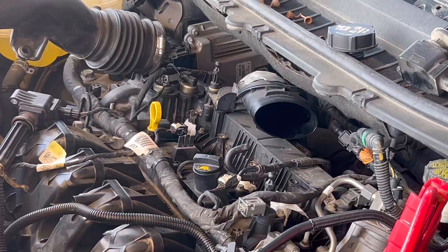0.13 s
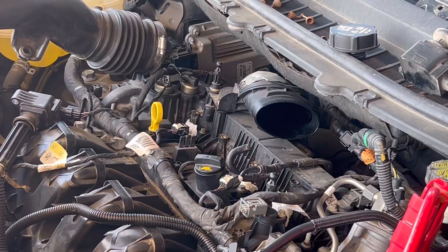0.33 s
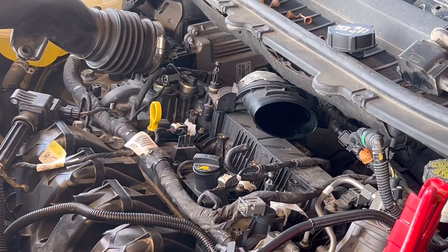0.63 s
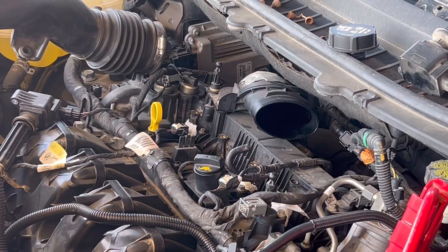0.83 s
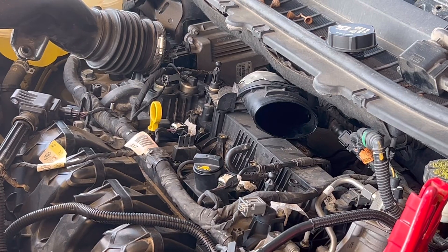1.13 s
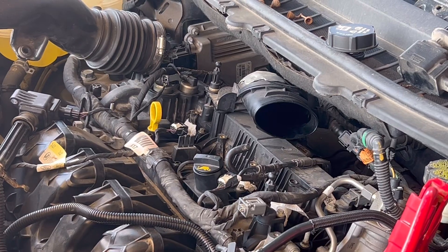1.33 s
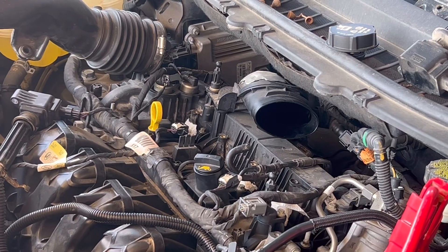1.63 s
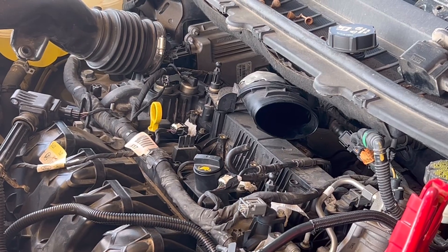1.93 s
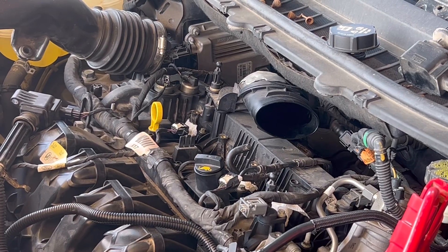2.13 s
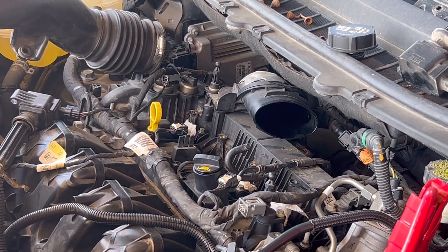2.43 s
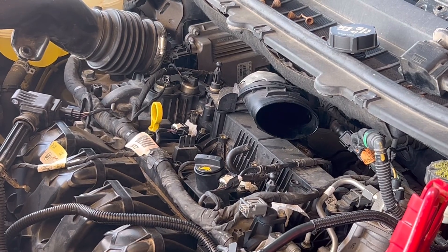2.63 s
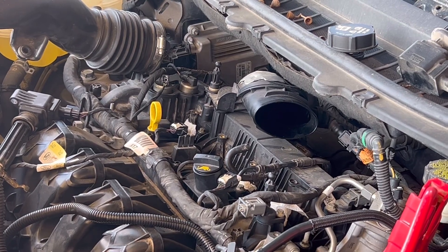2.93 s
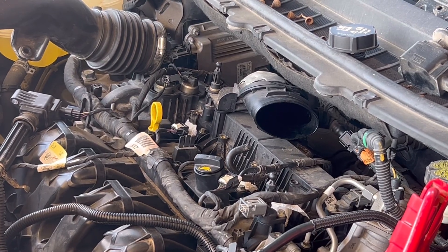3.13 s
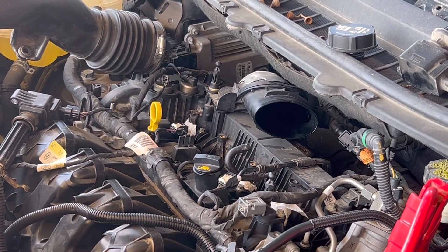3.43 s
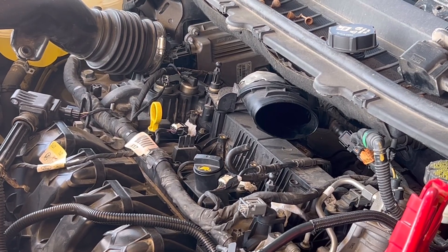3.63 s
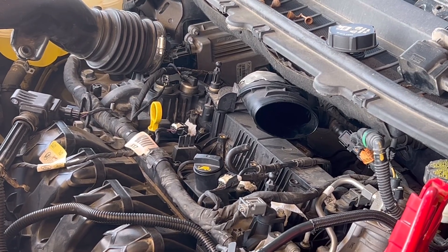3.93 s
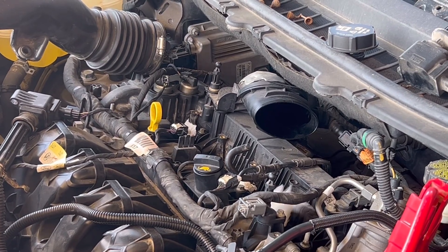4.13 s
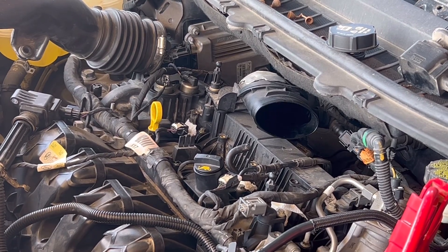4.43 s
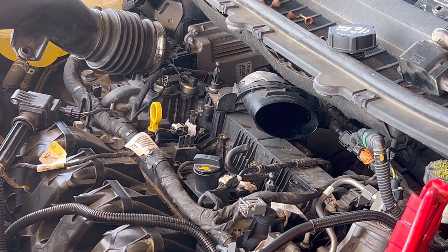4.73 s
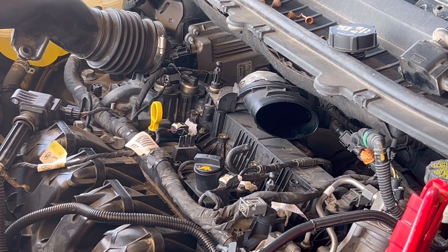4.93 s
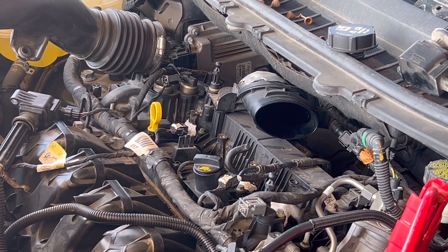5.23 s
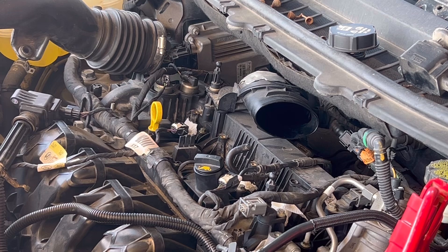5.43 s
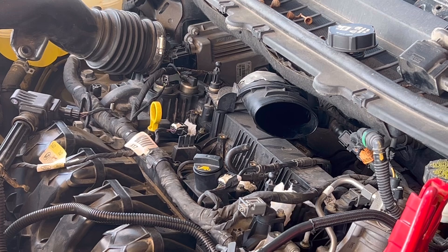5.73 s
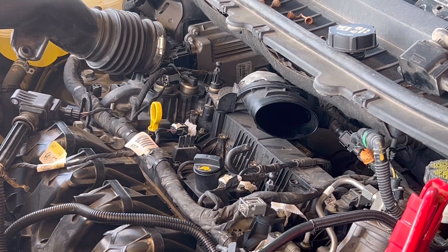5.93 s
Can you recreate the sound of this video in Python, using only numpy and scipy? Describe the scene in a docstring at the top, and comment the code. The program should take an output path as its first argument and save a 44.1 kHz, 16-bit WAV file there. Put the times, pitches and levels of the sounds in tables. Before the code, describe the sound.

After a tiny silence, a four-cylinder car engine is heard already running at a fast idle, close above its open bay. A low drone around 100 Hz, with rougher upper tones, throbs over rumble, soft mechanical rustle and faint belt hiss. It climbs in pitch until about 1.4 s, with a small spit of air near 1.0 s, then drops quickly by 1.9 s and slowly rises again, the boom growing much stronger toward 2.9 s. At 3.0 s a switch snaps: several tight bright cracks with short metallic ringing. A small electric motor immediately runs up within about half a second, through brief chirps of tone, to a high wavering whine with a strong airy rush. Engine knocks and rustle become heavier from 3.6 to 4.9 s. The motor sags slightly between 4 and 5 s, then recovers; everything continues until the abrupt end near 6.1 s.

```python
"""A car engine held at a fast idle, heard from just above the open engine bay.
From the start, its firing drone, built from unsteady tones, swells and sags over a throbbing rumble,
rustle and hiss of shaped noise, with knocks on every engine cycle. There is one brief spit of air near 1 s.
Halfway through, a switch snaps as short cracks and decaying rings. A small electric motor then runs up, with
short bursts of tone, to a wavering whine of shaft tones and a rush of air; for a while it runs a little slower."""
import sys
import numpy as np
from scipy import signal
from scipy.fft import rfft, irfft
from scipy.io import wavfile
from scipy.ndimage import uniform_filter1d

SR = 44100
rng = np.random.default_rng(int(sys.argv[2]) if len(sys.argv) > 2 else 0)


def waveform_to_disk(signal):
    """Save audio, clipped to [-1, 1], as 16-bit WAV at the path in sys.argv[1]."""
    frames = np.transpose(np.atleast_2d(signal))
    scaled = np.clip(frames, -1, 1) * 32767
    samples = np.round(scaled).astype(np.int16)
    wavfile.write(sys.argv[1], SR, samples)


N = 268657
TIME = np.arange(N) / SR  # seconds
BINS = np.fft.rfftfreq(N, 1 / SR)  # Hz

# The engine. Levels in its tables come before the gains named in its functions.
# engine speed: (time [s], firings per second [Hz])
FIRING_RATE = [(0.04, 47.0), (0.29, 48.6), (1.44, 54.3), (1.55, 53.5), (1.71, 47.2), (1.86, 45.5),
               (2.69, 48.4), (3.09, 48.2), (3.71, 51.0), (4.15, 51.0), (5.08, 52.8), (6.04, 53.6),
               (6.09, 53.2)]
# level of the boom, the 2nd multiple of the firing rate: (time [s], level [dB])
BOOM_LEVEL = [(0.04, -23.5), (0.07, -22.5), (0.21, -20.5), (0.61, -29.5), (0.8, -22.5), (0.97, -27.5),
              (1.4, -18), (1.59, -22), (1.78, -15.5), (1.88, -20.5), (2.85, -9), (3.56, -11.5),
              (3.73, -15.5), (3.9, -11.5), (4.81, -12), (6.09, -18.5)]
# level of the 3rd multiple: (time [s], level [dB])
THIRD_LEVEL = [(0.04, -24.5), (0.09, -21), (1.55, -27.5), (1.57, -24), (2.62, -24), (3.14, -38.5),
               (3.22, -31), (3.81, -22.5), (3.88, -26), (4.49, -22), (5.04, -34.5), (5.31, -26.5),
               (6.09, -22.5)]
# level of the 4th multiple: (time [s], level [dB])
FOURTH_LEVEL = [(0.04, -38), (0.21, -30), (0.87, -18.5), (1.27, -36), (1.74, -22.5), (1.83, -33.5),
                (1.98, -24), (2.31, -23), (3.02, -33), (3.54, -22), (5.58, -34), (6.09, -28.5)]
# weaker engine tones, three firings to a cycle: (multiple of firing rate, level against the rumble [dB])
WEAK_LINES = [(0.97, -12), (4 / 3, -11), (7 / 3, -8.5), (10 / 3, -10), (11 / 3, -4.5), (13 / 3, -5.5),
              (5, -5), (16 / 3, -10), (7, -11.5), (22 / 3, -15.5), (8, -17), (10, -18.5), (11, -24.5),
              (12, -23.5)]
# the bay hums along for a while: (start [s], length [s], level [dB], multiple of firing rate)
BAY_HUMS = [(0.0, .29, -34, 6), (1.56, .1, -20, 3), (1.75, .9, -43.5, 9), (1.85, 2.1, -37.5, 6),
            (3.88, .7, -31, 6), (4.03, .67, -32.5, 9), (4.87, 1.3, -38.5, 9)]
HUM_RAMP_S = 0.063
# the engine tones lean slowly from left to right: (time [s], left minus right [dB])
DRONE_SIDE = [(0.04, 1.0), (1.3, 1.6), (3.0, .6), (4.3, .5), (6.09, -1.2)]
# knocks given off by the block on every cycle: (frequency [Hz], level of a line against the rustle [dB])
CLATTER_COLOUR = [(120, -0.5), (300, -11), (450, -12.5), (600, -10.5), (850, -14), (1100, -24.5),
                  (1400, -21)]
# how hard the engine works, as the level of its mechanical rustle: (time [s], level [dB])
EFFORT_LEVEL = [(0.06, -52), (3.25, -43), (3.65, -37.5), (3.9, -38), (4.14, -36), (4.93, -37),
                (5.01, -40.5), (6.09, -44)]
# level of the block rumble: (time [s], level [dB])
RUMBLE_LEVEL = [(0.06, -45.5), (0.14, -42), (0.66, -43), (0.78, -41.5), (1.52, -39), (5.21, -37),
                (5.4, -38.5), (6.09, -41)]
# level of the belt and intake hiss: (time [s], level [dB])
HISS_LEVEL = [(0.06, -62.5), (1.1, -61), (1.15, -62), (2.95, -52.5)]
# colour of the rumble, only its shape counts: (frequency [Hz], level [dB per Hz])
RUMBLE_COLOUR = [(20, -30), (40, -10.5), (60, 1.5), (120, -2.5), (200, -6), (280, -2.5), (400, -6),
                 (520, -10), (700, -19.5), (1200, -47.5), (3000, -71)]
# colour of the rustle, only its shape counts: (frequency [Hz], level [dB per Hz])
RUSTLE_COLOUR = [(200, -32.5), (500, 4.5), (800, 0.5), (1100, -1.5), (1400, -1.5), (1750, -3), (2000, -6),
                 (2400, -2.5), (3200, -9), (4200, -15), (8000, -39)]
# colour of the hiss, only its shape counts: (frequency [Hz], level [dB per Hz])
HISS_COLOUR = [(1500, -22), (3000, -6), (4500, -4), (5300, -1.5), (7000, -0.5), (8500, -1.5), (10000, -8.5),
               (11500, -11.5), (12700, -14.5), (15000, -18), (16000, -21.5)]
# one brief spit of air
SPIT_S, SPIT_WIDTH_S, SPIT_DB = 1.042, 0.03, -56

# The electric motor runs up from a first kick toward its top speed (turns per second).
KICK_HZ, TOP_HZ, RUN_UP_S, RUN_UP_SHAPE = 60, 265.6, .13, 1.08
# its speed wobbles slowly; one crest of the wobble falls at the given time
WOBBLE_HZ, WOBBLE_CREST_S = 7.42, 3.47
# for a while it labours and runs a little slower (SAG_HZ in turns per second)
SAG_FROM_S, SAG_TO_S, SAG_RAMP_S, SAG_HZ = 3.97, 5.02, .16, 3.7
# air rush and whine at top speed, before the housing; each grows with its own power of the speed
RUSH_DB, RUSH_POWER, WHINE_DB, WHINE_POWER = -30.5, 0.22, -39, 3.1
# strong tones of the shaft: (multiple of shaft rate, level against the whine [dB])
MOTOR_LINES = [(6, -10), (7, -10), (9, -15), (11, -11.5), (13, -13), (14, -16), (18, -14), (20, -15),
               (23, -9), (24, -3), (25, -14), (27, -10), (29, -17), (30, -16), (31, -4), (32, -13)]
# resonances of the motor's shell: (frequency [Hz], width [Hz], level against the plain wall [dB])
HOUSING_RESONANCES = [(1533, 38, -3.5), (3400, 580, -15.5), (5230, 270, -11), (6270, 200, -2.5),
                      (7050, 85, -6)]
# colour of the air through the motor, only its shape counts: (frequency [Hz], level [dB per Hz])
RUSH_COLOUR = [(400, -8.5), (900, -2), (1800, -1.5), (2500, -4), (3300, 2), (4200, 1.5), (5300, 2),
               (6500, 3), (8500, 3.5), (9800, 4), (11200, 3), (12600, -3.5), (15000, -4.5), (16000, -20)]
# the bearing sings off the shaft's multiples: (multiple of shaft rate, level against the whine [dB])
BEARING_LINES = [(5.85, -14), (13.3, -5), (13.65, -2)]
# short bursts of bearing and shaft tones that stand out as the motor runs up:
# (start [s], length [s], level [dB], multiple of shaft rate)
RUN_UP_BURSTS = [(3.01, .04, -40, 13.65), (3.062, .028, -38, 24), (3.078, .025, -36, 13.65),
                 (3.1, .085, -43, 6.58), (3.105, .195, -41, 13.65), (3.132, .025, -35, 13.65),
                 (3.17, .13, -45, 20.4), (3.175, .1, -37, 6.58), (3.262, .065, -35, 25),
                 (3.296, .135, -32, 13.65)]
BURST_RAMP_S = 0.0062

# The switch snaps shut and bounces: (time [s], level [dB])
SNAPS = [(2.9935, -17), (2.9962, -17.5), (2.998, -21), (3.0, -25)]
# tones its metal rings with: (frequency [Hz], level [dB], time to fall by 60 dB [s])
SWITCH_RINGS = [(1138, -22, 0.43), (1360, -6, 0.024), (2690, -13, 0.022), (4100, -9, .01),
                (4800, -11, 0.058), (5710, -1, 0.016), (6200, 1, 0.022), (6300, -3, 0.02), (7200, -17, .02),
                (8400, -10, .02)]

# The two microphone ports: (frequency [Hz], how far left leads right [radians])
PORT_PHASE = [(0, 0), (500, 0), (950, .8), (1460, .1), (2200, 0), (3600, .45), (4900, 0), (7200, 0),
              (8000, -.65), (8700, -1.5), (9300, -2.6), (10000, -3.14), (10500, -3.35), (11200, -4.1),
              (12000, -5.1), (12800, -6.1), (13500, -6.3), (14200, -6.6), (15000, -7.7), (16000, -8.6)]
# stereo width of the noise: (frequency [Hz], likeness of left and right, 1 = the same and 0 = unrelated)
STEREO_LIKENESS = [(60, .97), (200, 0.55), (380, 0.77), (750, .15), (1300, 0.65), (1900, 1), (2400, 1),
                   (3000, 0.99), (3700, 1), (4300, 1), (5000, 1), (7200, 1), (8000, 0.76), (9000, 1),
                   (10000, 1), (11200, 0.81), (13300, 0.97), (15000, 0.78)]
START_S, FADE_S = .035, .002  # silence up to the start, then a short fade-in
EDGE_HZ = 15800  # upper edge of the sound
# limiter: the level it holds peaks to, and how fast it lets go
CEILING_DB, RECOVER_DB_PER_S = -3, 200


def engine_tones(turns, third_db=-0.1, fourth_db=-1, weak_db=6.5, apart=0.15):
    """Regular firing gives clean low multiples of its rate, with rougher weak lines and passing hums."""
    boom = amp(curve(BOOM_LEVEL)) * line(turns, 2, rough=0.035, rate_hz=11)
    third = amp(curve(THIRD_LEVEL) + third_db) * line(turns, 3, rough=0.07, rate_hz=12)
    fourth = amp(curve(FOURTH_LEVEL) + fourth_db) * line(turns, 4, rough=0.15, rate_hz=10)
    weak = sum(amp(db) * line(turns, k, rough=0.58, rate_hz=2.5) for k, db in WEAK_LINES)
    weak = amp(curve(RUMBLE_LEVEL) + weak_db) * weak
    hums = bursts(turns, BAY_HUMS, HUM_RAMP_S, rough=0.21, rate_hz=10)
    tones = boom + third + fourth + weak + hums
    # standing waves in the bay reach the ports slightly out of step, more so for higher tones up to 240 Hz
    quarter_turned = irfft(rfft(tones) * 1j * np.minimum(BINS, 240) / 200, N)
    side = apart * drift(0.45) * quarter_turned
    lean_db = curve(DRONE_SIDE) * np.array([[.5], [-.5]])
    return np.array([tones + side, tones - side]) * amp(lean_db)


def clatter(turns, gain_db=-2, uneven_db=2, steepness=2.4):
    """Knocks that come back on every engine cycle: a close comb of lines that grows quickly with load."""
    multiples = np.arange(8, 78) / 3  # a cycle lasts three firings
    hz, db = np.transpose(CLATTER_COLOUR)
    mean_rate_hz = turns[-1] / TIME[-1]
    line_db = np.interp(multiples * mean_rate_hz, hz, db)
    heights = amp(line_db + uneven_db * rng.standard_normal(len(multiples)))
    # build one cycle, then play it round and round at the speed of the engine
    cycle = np.linspace(0, 3, 2048)
    shape = sum(h * np.cos(2 * np.pi * (k * cycle + rng.random())) for k, h in zip(multiples, heights))
    effort_db = curve(EFFORT_LEVEL)
    peak_db = effort_db.max()
    level_db = peak_db + steepness * (effort_db - peak_db)
    return amp(level_db + gain_db) * np.interp(turns % cycle[-1], cycle, shape)


def engine_noise(turns, rumble_db=4.5, rustle_db=2.0, hiss_db=4.5, throb=0.17):
    """Block rumble and valve-gear rustle that throb with each firing, and steadier hiss with one spit."""
    beat = 1 + throb * np.cos(2 * np.pi * turns)
    rumble = amp(curve(RUMBLE_LEVEL) + rumble_db) * beat * noise(RUMBLE_COLOUR)
    rustle_gain = amp(curve(EFFORT_LEVEL) + rustle_db + 0.79 * drift(90))
    rustle = rustle_gain * np.sqrt(abs(beat)) * noise(RUSTLE_COLOUR)
    spit = amp(SPIT_DB) * np.exp(-((TIME - SPIT_S) / SPIT_WIDTH_S) ** 2)
    hiss_gain = amp(curve(HISS_LEVEL) + hiss_db + .6 * drift(120))
    hiss = (hiss_gain + spit) * noise(HISS_COLOUR)
    return rumble + rustle + hiss


def motor(comb_db=-21, flutter_db=1.3):
    """A fast shaft with a slow wobble; its lines sweep through the housing as it runs up."""
    speed = motor_speed()
    turns = np.cumsum(speed) / SR
    whine_gain = amp(WHINE_DB) * (speed / TOP_HZ) ** WHINE_POWER
    whine = sum(amp(db) * line(turns, k, rough=.18, rate_hz=20) for k, db in MOTOR_LINES)
    # the brushes scrape alike on every turn: a faint comb of multiples 4 to 57
    comb = sum(np.cos(2 * np.pi * (k * turns + rng.random())) for k in np.arange(4, 58))
    rush_gain = amp(RUSH_DB + flutter_db * drift(200)) * (speed / TOP_HZ) ** RUSH_POWER
    rush = rush_gain * noise(RUSH_COLOUR)
    # the shaft shakes the shell directly, so its lines pass the resonances twice and the air only once
    shaken = whine_gain * housing(whine + amp(comb_db) * comb)
    run_up = bursts(turns, RUN_UP_BURSTS, BURST_RAMP_S, rough=0.32, rate_hz=50)
    running = TIME > SNAPS[0][0]
    return running * (bearing(turns, whine_gain) + run_up + housing(rush + shaken))


def motor_speed():
    """Turns per second: a quick run-up from the snap of the switch, one sag, and a steady wobble."""
    age = np.maximum(TIME - SNAPS[0][0], 0)
    speed = TOP_HZ - (TOP_HZ - KICK_HZ) * np.exp(-(age / RUN_UP_S) ** RUN_UP_SHAPE)
    wobble = .0048 * np.cos(2 * np.pi * WOBBLE_HZ * (TIME - WOBBLE_CREST_S))
    jitter = .0004 * drift(50)
    return (speed - SAG_HZ * labouring()) * (1 + wobble + jitter)


def labouring():
    """1 while the motor sags under load, otherwise 0, with ramps between."""
    return held(SAG_FROM_S, SAG_TO_S, SAG_RAMP_S)


def bearing(turns, whine_gain, sing_db=.5, labour_db=-3):
    """Rough steady tones off the shaft's multiples, which ease while the motor labours."""
    sing = sum(amp(db) * line(turns, k, rough=0.96, rate_hz=35) for k, db in BEARING_LINES)
    return amp(sing_db + labour_db * labouring()) * whine_gain * sing


def housing(x):
    """The motor shell lifts whatever passes through its resonances."""
    lift = sum(amp(db) / (1 + 2j * (BINS - hz) / width) for hz, width, db in HOUSING_RESONANCES)
    return irfft(rfft(x) * (1 + lift), N)


def switch(crack_db=-3, crack_t60_s=0.023):
    """Each blow of the contact is a short crack of noise and a ring of its metal, both dying away."""
    out = np.zeros(N)
    for start, blow_db in SNAPS:
        age = np.maximum(TIME - start, 0)
        ring = sum(amp(db - 60 * age / t60) * np.sin(2 * np.pi * hz * age) for hz, db, t60 in SWITCH_RINGS)
        crack = amp(crack_db - 60 * age / crack_t60_s) * rng.standard_normal(N) * (age > 0)
        out += amp(blow_db) * (ring + crack)
    return out


def line(turns, multiple, rough, rate_hz):
    """One multiple of a rotation, unsteady in strength and phase, with an rms of 1."""
    angle = 2 * np.pi * (multiple * turns + rng.random())
    tone = (1 + rough * drift(rate_hz)) * np.cos(angle) + rough * drift(rate_hz) * np.sin(angle)
    return evened(tone)


def bursts(turns, rows, ramp, rough, rate_hz):
    """Multiples of a rotation that each swell, hold for a while and stop."""
    out = np.zeros(N)
    for start, length, db, multiple in rows:
        out += amp(db) * held(start, start + length, ramp) * line(turns, multiple, rough, rate_hz)
    return out


def noise(colour):
    """Coloured stereo noise, wider where left and right are less alike; its common part has an rms of 1."""
    shared, apart = rfft(rng.standard_normal((2, N))) * amp(read(colour))
    same = np.clip(read(STEREO_LIKENESS), -1, 1)
    mid = irfft(shared * np.sqrt(1 + same), N)
    side = irfft(apart * np.sqrt(1 - same), N)
    return np.array([mid + side, mid - side]) / np.std(mid)


def drift(rate_hz):
    """A smooth random wander with an rms of 1, quicker for a higher rate."""
    points = rng.standard_normal(int(2 * rate_hz * TIME[-1]) + 4)
    smooth = signal.resample_poly(points, 8, 1)
    return evened(np.interp(TIME * 2 * rate_hz, np.arange(len(smooth)) / 8, smooth))


def held(start, end, ramp):
    """Rises, holds at 1 and falls again between two times."""
    return np.clip(np.minimum(TIME - start, end - TIME) / ramp, 0, 1)


def curve(rows):
    """A table over time, joined by straight lines."""
    seconds, value = np.transpose(rows)
    return np.interp(TIME, seconds, value)


def read(points):
    """A table over frequency, read at every bin along a logarithmic scale."""
    hz, value = np.transpose(points)
    return np.interp(np.log(BINS + 1), np.log(hz + 1), value)


def evened(x):
    """Scales to an rms of 1."""
    return x / np.sqrt(np.mean(x ** 2) + 1e-20)


def amp(db):
    """Decibels to gain."""
    return 10 ** (np.asarray(db) / 20)


def scene():
    """Engine, motor and switch, close together in the bay."""
    turns = np.cumsum(curve(FIRING_RATE)) / SR  # one turn per firing
    return engine_tones(turns) + clatter(turns) + engine_noise(turns) + motor() + switch()


def record(dry):
    """The ports shift the treble against each other; then the start, a peak limiter and the band limit."""
    lead = np.exp(.5j * read(PORT_PHASE) * np.array([[1], [-1]]))
    heard = irfft(rfft(dry) * lead, N) * np.clip((TIME - START_S) / FADE_S, 0, 1)
    # the louder side sets one gain for both; it drops at once and recovers steadily
    over_db = np.maximum(20 * np.log10(abs(heard).max(0) + 1e-9) - CEILING_DB, 0)
    recovery = RECOVER_DB_PER_S * TIME
    duck_db = np.maximum.accumulate(over_db + recovery) - recovery
    duck_db = uniform_filter1d(duck_db, size=32)
    low_pass = signal.firwin(511, EDGE_HZ, window=("kaiser", 9), fs=SR)
    return signal.oaconvolve(heard * amp(-duck_db), low_pass[None], "same")


dry = scene()
out = record(dry)
waveform_to_disk(out)
```